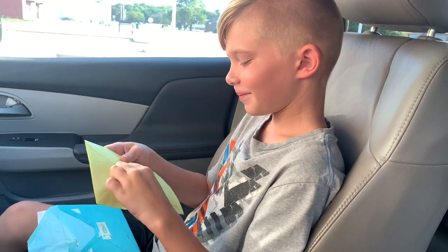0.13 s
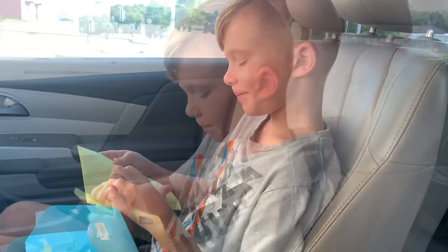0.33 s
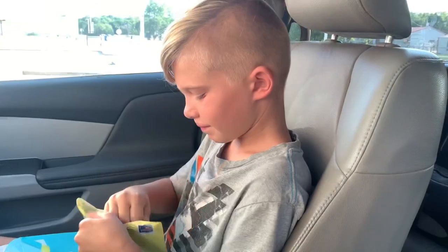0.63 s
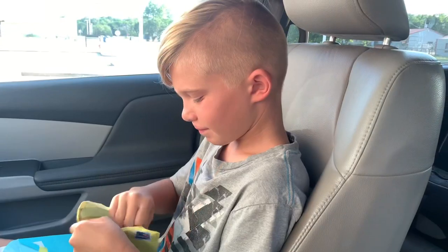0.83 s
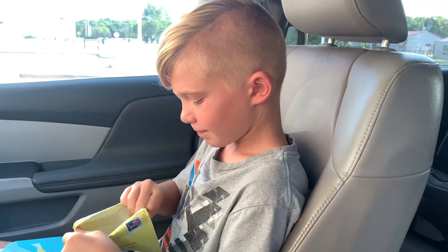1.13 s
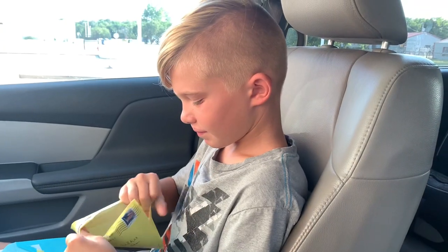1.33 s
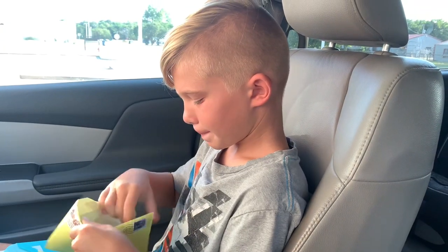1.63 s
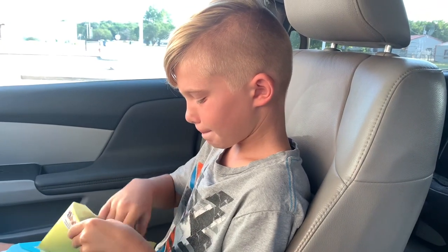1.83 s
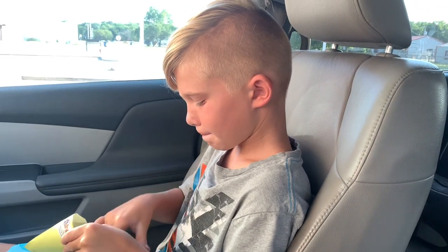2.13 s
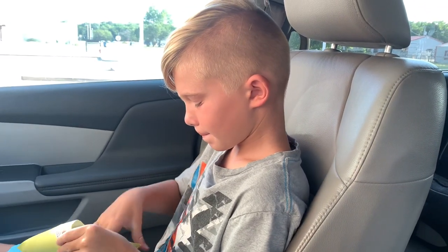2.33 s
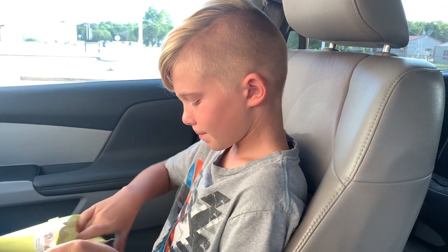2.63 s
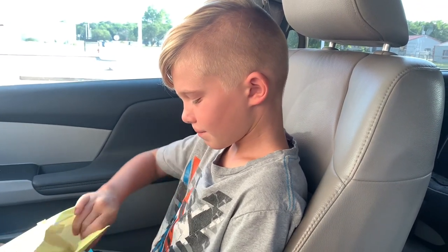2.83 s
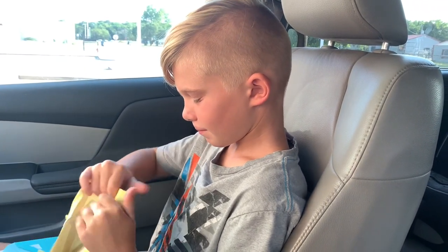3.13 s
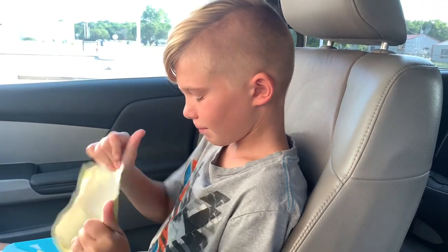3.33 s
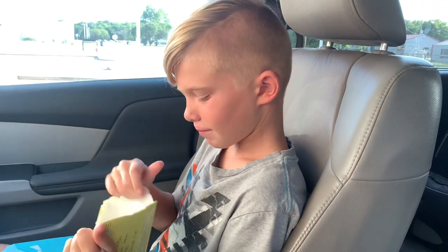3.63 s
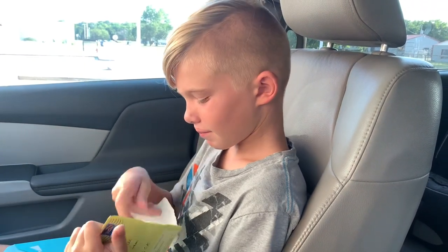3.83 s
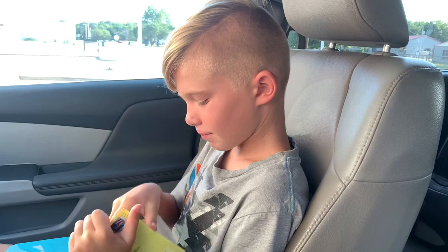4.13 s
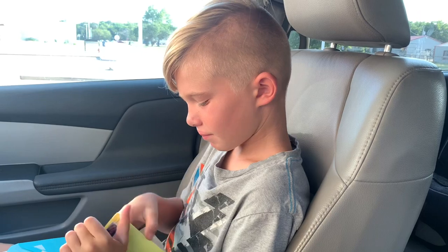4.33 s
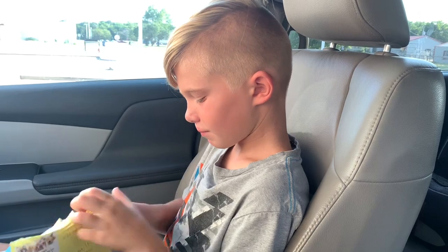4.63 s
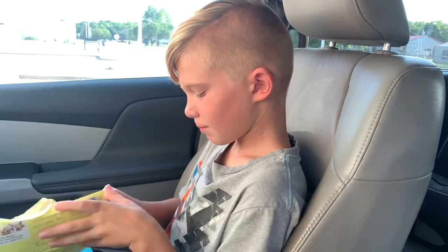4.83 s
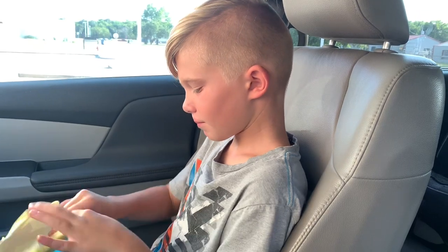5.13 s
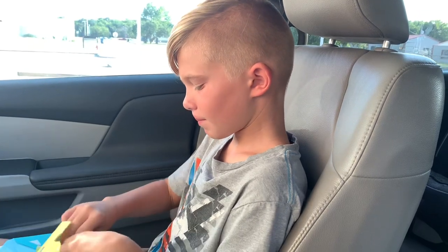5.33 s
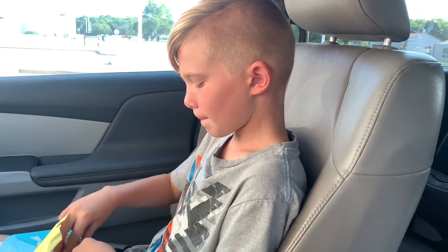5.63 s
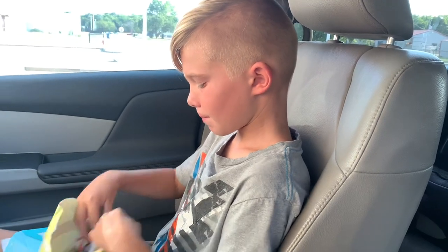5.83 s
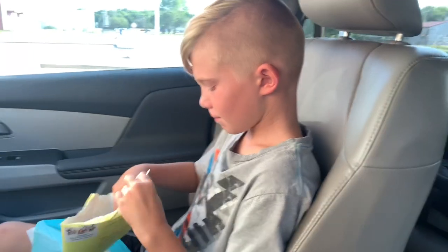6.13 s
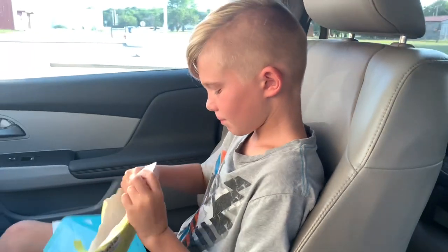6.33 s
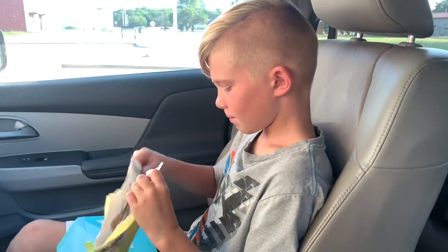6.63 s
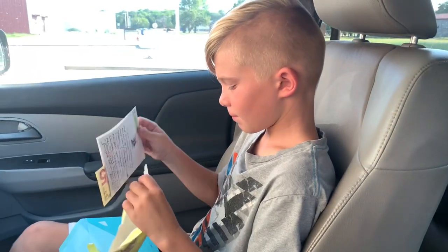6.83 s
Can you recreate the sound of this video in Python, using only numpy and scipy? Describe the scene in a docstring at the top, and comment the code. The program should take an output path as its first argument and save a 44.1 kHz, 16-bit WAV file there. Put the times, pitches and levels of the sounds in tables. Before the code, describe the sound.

A paper envelope is ripped open and crumpled close by, with sharp crackling snaps, bright rustle and soft lap thumps in a quiet car.

```python
"""In a parked car, a paper envelope is ripped open and crumpled by hand near a small two-microphone recorder.
Snaps, rips and rustle drive noise coloured as sheet, fibres and pocket; freed panels ring as short sines.
The envelope's mouth rings, the whole sheet flaps, and thumps sink into the seat and a low boom.
The padded cabin answers with brief noise tails over a faint steady bed."""
import sys
import numpy as np
from scipy import signal
from scipy.fft import rfft, irfft, next_fast_len
from scipy.io import wavfile
from scipy.ndimage import uniform_filter1d

SR = 44100
rng = np.random.default_rng(int(sys.argv[2]) if len(sys.argv) > 2 else 0)


def waveform_to_disk(signal):
    """Save audio, clipped to [-1, 1], as 16-bit WAV at the path in sys.argv[1]."""
    frames = np.transpose(np.atleast_2d(signal))
    scaled = np.clip(frames, -1, 1) * 32767
    samples = np.round(scaled).astype(np.int16)
    wavfile.write(sys.argv[1], SR, samples)


N = 307377


def amp(db):
    """Gain of a level in dB."""
    return 10 ** (np.asarray(db) / 20)


def unit(x):
    """x at rms 1."""
    return x / np.sqrt(np.mean(x ** 2) + 1e-20)


def along(points, hz):
    """Read a curve of (Hz, value) points on a log frequency axis."""
    f, value = np.transpose(points)
    return np.interp(np.log(hz + 1), np.log(f + 1), value)


def filtered(x, response):
    """x shaped by a complex response of frequency."""
    m = next_fast_len(N + 8192)
    return irfft(rfft(x, m) * response(np.fft.rfftfreq(m, 1 / SR)), m)[..., :N]


def hiss(response, patchy_db):
    """Two unrelated coloured noises, rms 1 together, sharing patches of random gain in time and pitch."""
    z = signal.stft(rng.standard_normal((2, N)), nperseg=256)[2]
    field = uniform_filter1d(rng.standard_normal(z.shape[1:]), 4, 0)
    patches = amp(patchy_db * unit(uniform_filter1d(field, 6, 1)))
    noise = signal.istft(z * patches, nperseg=256)[1][:, :N]
    return unit(filtered(noise, response))


def curve_hiss(points, patchy_db):
    """Patchy noise coloured by a curve of (Hz, dB) points."""
    return hiss(lambda f: amp(along(points, f)), patchy_db)


def crackle(per_s, spread_db, t60, smooth):
    """Power envelope of mean 1: random tiny slips, each dying in t60 seconds, over a smooth share."""
    strength = amp(2 * spread_db * np.minimum(rng.exponential(size=N), 3))
    slips = (rng.random(N) < per_s / SR) * strength
    power = signal.lfilter([1], [1, -amp(-120 / (t60 * SR))], slips)
    return smooth + (1 - smooth) * power / power.mean()


# Snapping creases: t/s, level/dB, fibre level/dB re level, pocket level/dB re level,
# panel note f/Hz, base decay t60/s
CREASE_SNAPS = [(0.2194, -22, -12.5, -28, 2495, 0.04), (0.2901, -38.5, 6.5, -13, 4270, 0.027),
                (0.3389, -30.5, -8.5, -4, 3626, 0.027), (0.3621, -13.5, -0.5, -31, 4054, 0.05),
                (0.3814, -26, -1.5, -25, 4394, 0.058), (0.401, -8.5, 1, -14.5, 1632, 0.046),
                (0.4374, -17.5, -5, -8.5, 846, 0.045), (0.4852, -34, 3, -27, 4500, 0.078),
                (0.5014, -18, 2.5, 1.5, 912, 0.017), (0.5134, -19.5, 2.5, -16, 872, 0.042),
                (0.5544, -23, 0.5, -15.5, 2490, 0.05), (0.595, -16.5, 1.5, -25.5, 3880, 0.05),
                (0.608, -17, 3, -15.5, 3880, 0.075), (0.6866, -31, -12, -10.5, 2440, 0.062),
                (0.7229, -33, -3, -23, 3610, 0.05), (0.7597, -30, -4.5, -30.5, 2577, 0.056),
                (0.7814, -36, 3, 0, 690, 0.05), (0.81, -23, 6, -24.5, 2260, 0.044),
                (0.9404, -30, 11, -20, 4510, 0.055), (0.9981, -40.5, 15, -10, 4280, 0.042),
                (1.06, -15, 5, -20, 4285, 0.05), (1.0704, -13, 6, -16, 768, 0.017),
                (1.1119, -12, 4.5, -15, 843, 0.031), (1.1518, -34, 7, -5.5, 612, 0.042),
                (1.1742, -24.5, -4.5, -8.5, 864, 0.034), (1.1879, -18, 4.5, -9.5, 4006, 0.056),
                (1.2004, -19, 9, -5, 715, 0.031), (1.2184, -14, 2.5, -19.5, 1728, 0.05),
                (1.2264, -14.5, 9, -24.5, 4320, 0.017), (1.2704, -27, 10.5, -15.5, 1700, 0.05),
                (1.3044, -18, 6, -9, 798, 0.055), (1.3374, -38.5, -9, -0.5, 598, 0.061),
                (1.4072, -48.5, -13.5, 9, 650, 0.043), (1.484, -46.5, 4, 3, 583, 0.068),
                (1.5529, -30.5, -9, -5.5, 1502, 0.069), (1.5863, -14, -5, -13.5, 849, 0.033),
                (1.9814, -37.5, -11.5, -19, 1263, 0.15), (2.0737, -36.5, -12, 2, 620, 0.027),
                (2.1043, -28.5, -14.5, -12.5, 3570, 0.033), (2.1585, -26.5, -2.5, -31, 4300, 0.05),
                (2.1903, -19.5, -15, -12, 2650, 0.05), (2.2007, -24.5, -7, -2.5, 1265, 0.046),
                (2.3994, -46.5, -5.5, 3.5, 988, 0.033), (2.4553, -24.5, -6, -39, 3020, 0.036),
                (2.6579, -16.5, -15, -22, 1452, 0.041), (2.6698, -21.5, -10, -18, 1560, 0.063),
                (2.7851, -20.5, -20, -9, 2832, 0.05), (2.8505, -40.5, -1.5, -11, 994, 0.046),
                (3.022, -11.5, -24.5, -15, 2405, 0.039), (3.0861, -42, -11.5, -5, 4340, 0.085),
                (3.1108, -15.5, -11, -11.5, 963, 0.023), (3.1804, -30, 4, -28, 4170, 0.05),
                (3.2039, -14, 3, -21.5, 2640, 0.05), (3.2254, -18.5, 0, -17, 2690, 0.059),
                (3.243, -10, -2, -17.5, 2770, 0.05), (3.2514, -7, -9, -20.5, 4490, 0.041),
                (3.2595, 3, -1.5, -24.5, 4096, 0.05), (3.2713, -3, -2, -12.5, 868, 0.06),
                (3.2854, -1, -11, -15, 793, 0.05), (3.2934, -7.5, -11, 0.5, 634, 0.037),
                (3.4062, -51, -15, 8, 902, 0.043), (3.4634, -62.5, -9, 10, 1222, 0.035),
                (4.0058, -33, -8, -14.5, 2935, 0.05), (4.1345, -28.5, -22, -37, 2270, 0.059),
                (4.2342, -28.5, -20.5, -20, 2490, 0.055), (4.3838, -28, -13.5, -14.5, 2740, 0.057),
                (4.4672, -29, -3, -13.5, 557, 0.05), (4.6997, -26, -7.5, -22, 2370, 0.05),
                (4.747, -14, -9.5, -28, 2290, 0.14), (4.7631, -16, -9, -20, 4320, 0.038),
                (4.8843, -8.5, -7, -15.5, 824, 0.05), (5.0948, -15, -8, -20, 2517, 0.05),
                (5.1811, -24, -16.5, -16.5, 1050, 0.086), (5.23, -34, -16.5, -13, 4150, 0.045),
                (5.3006, -22, -12.5, -21, 2743, 0.05), (5.3228, -15.5, -13, -13, 1924, 0.041),
                (5.3854, -23.5, -7, -34, 2540, 0.055), (5.4029, -20.5, -16, -27, 2490, 0.05),
                (5.4902, -20.5, -16, -17, 1796, 0.05), (5.5303, -24, -24.5, -12.5, 4110, 0.039),
                (5.5414, -29.5, -3.5, -8, 539, 0.053), (5.559, -19.5, -8.5, -22, 4160, 0.034),
                (5.678, -1.5, -13.5, -31, 2455, 0.026), (5.7302, -19, -21.5, -7.5, 2480, 0.069),
                (5.7664, -19.5, -11.5, -22, 2630, 0.05), (5.7973, -31.5, 5, 1, 3230, 0.022),
                (5.8252, 1.5, -9.5, -18.5, 1310, 0.068), (5.8622, -22.5, -14, -28, 3756, 0.05),
                (5.918, -18.5, -1.5, -20, 4070, 0.039), (5.9733, -22, -2.5, -25, 2860, 0.05),
                (6.007, -2, -12, -31, 2486, 0.05), (6.0613, -10, -5.5, -33.5, 1722, 0.055),
                (6.096, -23.5, -3.5, -25, 2590, 0.043), (6.2761, -10.5, -8, -39, 4136, 0.041),
                (6.3375, -10.5, -33, -24, 2130, 0.0263), (6.4, -38, -7, -22, 2270, 0.044),
                (6.4714, -26, -7.5, -10.5, 2550, 0.044), (6.532, -21, -24.5, -25.5, 2308, 0.065),
                (6.6508, -24.5, -0.5, -20.5, 4300, 0.066), (6.7596, -40.5, -16, -7, 2870, 0.067),
                (6.9007, -32.5, -23, -40, 2750, 0.0494)]


def crease_snaps():
    """Creases let go: power bursts in sheet, fibres, pocket and flap, and the note each freed panel rings."""
    crest_db, flap_db = 8.5, -23.5  # peak over the sheet's burst; flap re pocket
    low_note_db, high_note_db = 1.5, -0.5  # note re pocket; note re sheet at that pitch
    power, notes = np.zeros((4, N + SR)), np.zeros(N + SR)
    t = np.arange(SR // 4) / SR
    for s, db, fibre_db, pocket_db, hz, t60 in CREASE_SNAPS:
        at = round(s * SR)
        life = max(t60, .01) * np.c_[[1, .8, 1.3, 1.6]]  # treble dies first, the pocket rings on
        rise = life * np.c_[[.085, .05, .09, .1]]  # slow snaps also start slowly
        # the tear runs on a moment, then stops
        shape = (1 - np.exp(-(t / rise) ** 2)) * amp(-60 * (t / life) ** 1.38)
        level = amp(db + np.c_[[-crest_db, fibre_db, pocket_db, pocket_db + flap_db]])
        burst = level * shape
        power[:, at:at + len(t)] += burst ** 2
        if hz < 1350:
            note_level = amp(low_note_db) * burst[2]
        else:
            note_level = amp(high_note_db + along(SHEET_COLOUR, hz)) * burst[0]
        blur = hz / 15000 * np.cumsum(rng.standard_normal(len(t)))  # limp paper holds no steady pitch
        notes[at:at + len(t)] += note_level * np.sin(2 * np.pi * hz * t + blur)
    # a snap is itself a volley of tearing fibres
    power[:2, :N] *= crackle(per_s=580, spread_db=3.0, t60=0.0091, smooth=.65)
    return power[:, :N], notes[:N]


# Drawn-out rips and slides: start t/s, length t/s, sheet level/dB,
# fibre level/dB re sheet, pocket level/dB re sheet
LONG_RIPS = [(.345, .18, -39, 5, -7.5), (0.597, .04, -30.5, 1, -15.5), (0.809, 0.098, -36, 13, -2),
             (.94, 0.16, -53.5, 16.5, -8.5), (1.054, 0.075, -31, 9.5, -5.5), (1.171, .065, -35, 12, -7.5),
             (1.251, 0.084, -46, 11, -3.5), (1.414, .11, -65.5, -9, 9), (1.749, 0.0299, -54, 1, -10),
             (2.085, 0.14, -49, -0.5, -3), (2.447, .07, -50.5, 8.5, -6), (2.558, .13, -51.5, 9, -10.5),
             (2.756, 0.05, -52.5, -6.5, -2), (2.989, .15, -45, -4.5, -8), (3.19, 0.11, -34.5, 14.5, -20.5),
             (3.253, 0.029, -20, -3.5, -2), (3.553, .14, -59, -3.5, 2.5), (3.847, .05, -55.5, 8.5, -12),
             (3.72, 0.041, -60, -3.5, -6.5), (3.998, 0.039, -46, -7.5, -8.5), (4.145, .3, -46, -3, -9.5),
             (4.476, 0.064, -42.5, 2, -8.5), (4.65, 0.082, -40, -4, -15.5), (4.738, 0.029, -35, -2, -15),
             (5.271, .14, -46, -14, 0.5), (5.454, .11, -39.5, -6.5, -8.5), (5.616, 0.21, -50, -7, -15),
             (5.73, 0.03, -49, -2, -14), (5.808, 0.061, -21, -1, -17), (5.875, .1, -32.5, 2, -18.5),
             (5.984, .16, -25, -1.5, -17), (6.155, 0.047, -33.5, 5.5, -12.5),
             (6.367, 0.12, -43.5, -3, -10.5), (6.526, 0.16, -34.5, 3, -17.5), (6.701, 0.064, -49, -3, -6.5),
             (6.865, 0.068, -56.5, -12, -23)]


def long_rips():
    """A running tear or slide: power of sheet, fibres and pocket swells, holds, then dies away."""
    rise_s, swell, t60 = 0.0034, 0.027, 0.11  # the rise lasts rise_s plus a share of the length
    t, power = np.arange(N) / SR, np.zeros((3, N))
    for start, length, db, fibre_db, pocket_db in LONG_RIPS:
        rise = np.clip((t - start) / (rise_s + swell * length), 0, 1)
        shape = rise * amp(-60 * np.clip(t - start - length, 0, 1) / t60)
        power += (amp(db + np.c_[[0, fibre_db, pocket_db]]) * shape) ** 2
    return power


# Rustle of the held paper: t/s, sheet level/dB, fibre level/dB re sheet
HELD_RUSTLE = [(0.0, -84, 1), (0.21, -56, -2), (0.49, -49.5, 5.5), (1.14, -54, 13), (1.36, -60, -0.5),
               (2.43, -67.5, -2), (2.64, -48.5, -5.5), (3.03, -57, -5.5), (3.2, -46.5, 1.5),
               (3.4, -74.5, -1.5), (4.04, -67.5, 2.5), (4.29, -52, -3.5), (4.58, -50, -2), (4.78, -47, -2),
               (4.91, -58, -4), (5.14, -59.5, -1.5), (5.34, -47, -1.5), (5.79, -39.5, -3), (6.0, -36.5, 2),
               (6.58, -42.5, -3.5), (6.76, -64, -0.5), (6.97, -68, 2.5)]


def held_rustle():
    """Fingers work the paper: power of sheet, fibres and pocket, and of the seat that moves with them."""
    pocket_db = -13.5  # re sheet
    seat_db, seat_follows = -56, .3  # seat when the sheet is at -50 dB; its share of the sheet's swings
    t = np.arange(N) / SR
    s, *columns = np.transpose(HELD_RUSTLE)
    sheet_db, fibre_db = [np.interp(t, s, c) for c in columns]
    power = amp(2 * np.array([sheet_db, sheet_db + fibre_db, sheet_db + pocket_db]))
    return power, amp(2 * (seat_db + seat_follows * (sheet_db + 50)))


# Colour of the sheet's rustle: f/Hz, level/dB
SHEET_COLOUR = [(500, -49.5), (1200, -10), (2400, 2), (3500, 2), (5500, 0.5), (7000, 1), (9000, -5.5),
                (13000, -22.5)]


def sheet_rustle(power):
    """The paper's surface radiates a broad, bright noise."""
    return np.sqrt(power) * curve_hiss(SHEET_COLOUR, patchy_db=3.0)


# Colour of the parting fibres: f/Hz, level/dB
FIBRE_COLOUR = [(4000, -40), (7600, -14.5), (8200, 1), (9500, -0.5), (11000, 1.5), (13000, -8),
                (15000, -1.5), (16000, -16.5)]


def fibre_hiss(power):
    """Parting fibres make the top-end hiss."""
    return np.sqrt(power) * curve_hiss(FIBRE_COLOUR, patchy_db=3.5)


# Resonances of the air in the envelope: f/Hz, width f/Hz, level/dB
POCKET_MODES = [(592.5, 66, 0), (853, 52, -3), (984, 43, 1.5), (1223, 1400, -9.5)]


def hollow_pocket(power):
    """Air in the envelope colours noise with bandpass modes of alternating sign, low-cut at 400 Hz."""
    def modes(f):
        total = 0
        for k, (centre, width, db) in enumerate(POCKET_MODES):
            damping = 1j * f * width
            total = total + (-1) ** k * amp(db) * damping / (centre ** 2 - f ** 2 + damping)
        return total * f ** 2 / (f ** 2 + 400 ** 2)
    return np.sqrt(power) * hiss(modes, patchy_db=3.5)


def envelope_mouth(power):
    """The envelope's mouth resonates, louder once the hand holds it open."""
    open_s, open_db, shut_db = 3.95, -8.5, -12.5  # levels re sheet
    centre_hz, width_hz = 2570, 220
    gain = amp(np.where(np.arange(N) > open_s * SR, open_db, shut_db))
    ring = lambda f: f * width_hz / (centre_hz ** 2 - f * f + 1j * f * width_hz)
    return gain * np.sqrt(power) * hiss(ring, patchy_db=3.0)


# Colour of the whole sheet pushing air: f/Hz, level/dB
FLAP_COLOUR = [(120, -42), (220, 6), (310, 3.5), (450, -4.5), (700, -17)]


def sheet_flap(power):
    """The whole sheet pushes air: a soft low-mid noise."""
    return np.sqrt(power) * curve_hiss(FLAP_COLOUR, patchy_db=0.5)


# Hands and envelope thumping the lap: t/s, level/dB, flap level/dB re level, boom level/dB re level
LAP_THUMPS = [(0.405, -34.5, -12, -10.5), (0.504, -39.5, -19, -31), (0.608, -42, 0, -10),
              (0.779, -54.5, -1.5, -10), (1.073, -49.5, -13, -24), (1.399, -36, -11, -16.5),
              (2.067, -33.5, -5, -14.5), (2.135, -41.5, -18.5, -16), (2.199, -51, -2, -9),
              (2.429, -54.5, -4.5, 0.5), (2.499, -62.5, 3, -2), (2.629, -46, -2.5, -6.5),
              (2.662, -36.5, -11.5, -5), (2.779, -45.5, 7, -6), (2.891, -41, -25, -13),
              (3.016, -35.5, -2, -8.5), (3.121, -36, -4, -9.5), (3.269, -31, 5.5, 0),
              (3.308, -32.5, -2.5, 1.5), (3.465, -47, -11.5, -4.5), (3.629, -44.5, -19, -7.5),
              (4.018, -46.5, -14.5, -10.5), (4.4, -47.5, -8, -3), (4.47, -40.5, -15.5, -7),
              (4.662, -47, -16.5, -11.5), (5.099, -52.5, 3, -3.5), (5.189, -42.5, -14, -11),
              (5.336, -32.5, -10.5, -19), (5.54, -40.5, -5.5, -8.5), (5.737, -39, -7, -4),
              (5.829, -29.5, -1, -19), (6.079, -37.5, -9, -13.5), (6.139, -38, -5, -3.5),
              (6.299, -42, -8.5, -10), (6.49, -42.5, -16, -14), (6.579, -44.5, -14.5, -4.5),
              (6.679, -40.5, -7.5, -5), (6.774, -34, -14.5, -22), (6.845, -42, -24, -7)]


def lap_thumps():
    """Power of flap, seat and boom: each thump sinks from the paper into the seat and the cabin."""
    rise_s, t60 = np.c_[[0.0096, 0.01, 0.068]], np.c_[[0.094, 0.23, 0.12]]  # flap, seat, boom
    crest_db = 3.5  # peak over the seat's burst
    power, t = np.zeros((3, N + SR)), np.arange(SR // 2) / SR
    shape = (1 - np.exp(-(t / rise_s) ** 2)) * amp(-60 * t / t60)
    shape = shape / shape.max(axis=1, keepdims=True)
    for s, db, flap_db, boom_db in LAP_THUMPS:
        at = round(s * SR)
        level = amp(db + np.c_[[flap_db, -crest_db, boom_db]])
        power[:, at:at + len(t)] += (level * shape) ** 2
    return power[:, :N]


# Colour of the bumped seat: f/Hz, level/dB
SEAT_COLOUR = [(60, -14), (100, 3), (135, 4.5), (170, -6.5), (300, -16.5), (500, -61.5)]


def seat_bumps(power):
    """Hands knock and shift on the padded seat: a dull noise."""
    return np.sqrt(power) * curve_hiss(SEAT_COLOUR, patchy_db=3.0)


def cabin_echoes(x, t60):
    """Glass and seats answer with a dying, duller noise whose pattern changes as the paper shifts."""
    hop = round(.4 * SR)  # a fresh tail every 0.4 s, crossfaded
    wet, window = np.zeros(N + 2 * SR), np.hanning(2 * hop)
    padded = np.pad(x, (hop, 2 * hop))
    decay = amp(-60 * np.arange(SR // 5) / SR / t60)
    for start in range(0, N + hop, hop):
        tail = rng.standard_normal(SR // 5) * decay
        dry_piece = padded[start:start + 2 * hop] * window
        piece = signal.fftconvolve(dry_piece, tail / np.linalg.norm(tail))
        wet[start:start + len(piece)] += piece
    return filtered(wet[hop:hop + N], lambda f: 1 / (1 + 1j * f / 7000))


# Colour of the cabin's low boom: f/Hz, level/dB
BOOM_COLOUR = [(20, -42.5), (35, 2), (55, 7.5), (75, 7.5), (110, -35)]


def cabin_boom(thump_power):
    """A faint low rumble that swells with each thump."""
    resting_db = -60.5
    return np.sqrt(amp(2 * resting_db) + thump_power) * curve_hiss(BOOM_COLOUR, patchy_db=0.0)


# Colour of the steady cabin bed: f/Hz, level/dB
CABIN_COLOUR = [(150, -11.5), (300, 2), (1000, -0.5), (2500, -8.5), (6000, -26), (16000, -7)]


def cabin_bed():
    """Steady, slightly patchy noise behind everything."""
    return amp(-64.5) * curve_hiss(CABIN_COLOUR, patchy_db=2.5)


def scene():
    """Mix paper, echoes, seat and cabin into what both microphones share and what differs between them."""
    rustle, seat = held_rustle()
    rustle = rustle + long_rips()
    snap, notes = crease_snaps()
    flap, bump, boom = lap_thumps()
    fine = crackle(per_s=220, spread_db=4.5, t60=.035, smooth=.55)
    coarse = crackle(per_s=27, spread_db=2, t60=0.32, smooth=0.14)
    paper = notes + sheet_rustle(rustle[0] * fine + snap[0])
    paper = paper + fibre_hiss(rustle[1] * fine + snap[1])
    paper = paper + hollow_pocket(rustle[2] * coarse + snap[2])
    paper = paper + envelope_mouth(rustle[0] * coarse + snap[0])
    rustle_flap = amp(2 * -13) * rustle[2]  # 13 dB under the pocket
    paper = paper + sheet_flap(snap[3] + flap + rustle_flap)
    shared = amp(1.5) * paper[0] + amp(-2.5) * cabin_echoes(paper[0], t60=0.057)
    apart = amp(3.5) * cabin_echoes(paper[0], t60=0.039) + amp(-6.0) * paper[1]
    return np.array([shared, apart]) + seat_bumps(seat + bump) + cabin_boom(boom) + cabin_bed()


# Likeness of the two microphones: f/Hz, likeness (0 to 1)
MIC_LIKENESS = [(40, 1), (90, 1), (150, 0.99), (300, 1), (800, 0.089), (2000, 0.35), (5000, 0.4),
                (7000, 0.79), (9000, 1), (16000, 0.27)]
# Phase by which the right leads, linear between points: f/Hz, phase/rad
RIGHT_LEAD = [(0, 0), (600, 0), (3000, -3.1), (6000, -6.3), (16000, 6.3)]
# Left minus right: f/Hz, level/dB
LEFT_OVER_RIGHT = [(300, 0), (2000, -1.5), (5200, -2.5), (7000, -0.5), (16000, 0.5)]


def record(dry):
    """Two spaced microphones share part of the sound, turned in phase; peaks clip, then the top is cut."""
    top_hz = 15800
    half_angle = lambda f: np.arccos(np.clip(along(MIC_LIKENESS, f), 0, 1)) / 2
    same, apart = filtered(dry, lambda f: np.array([np.cos(half_angle(f)), np.sin(half_angle(f))]))
    side = np.c_[[1, -1]]  # left, right

    def ports(f):
        lead = np.interp(f, *np.transpose(RIGHT_LEAD))
        return amp(side * along(LEFT_OVER_RIGHT, f) / 2) * np.exp(-.5j * side * lead)
    x = filtered(np.array([same + apart, same - apart]), ports)
    x = x / (1 + np.abs(x) ** 20) ** (1 / 20)  # clip with a slightly rounded knee
    return filtered(x, lambda f: f < top_hz)


dry = scene()
out = record(dry)
waveform_to_disk(out)
```